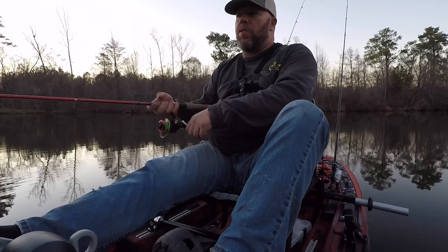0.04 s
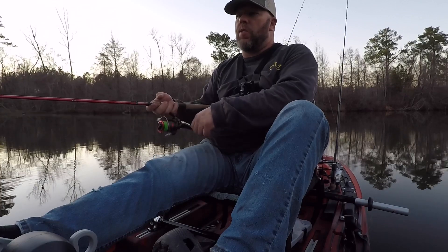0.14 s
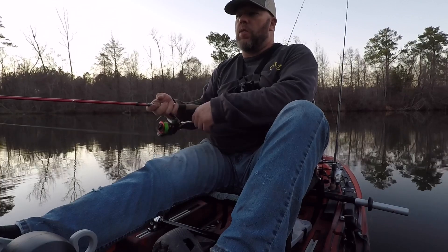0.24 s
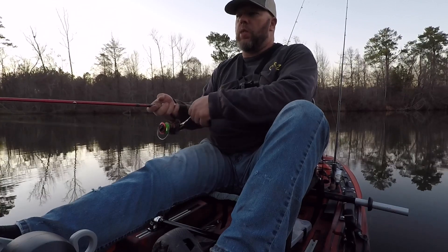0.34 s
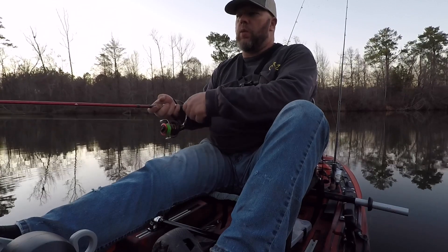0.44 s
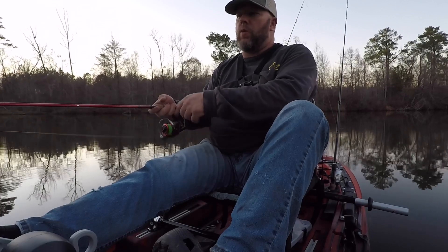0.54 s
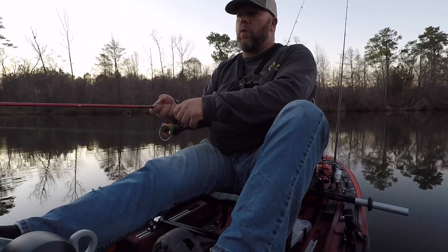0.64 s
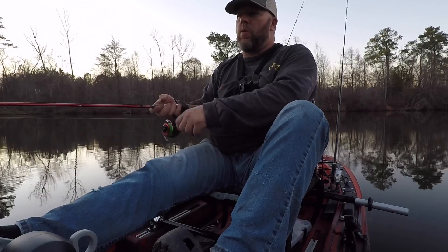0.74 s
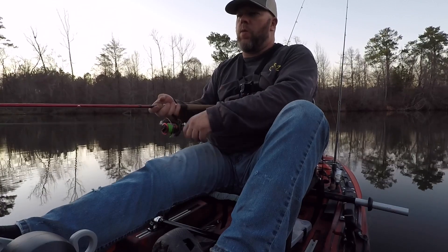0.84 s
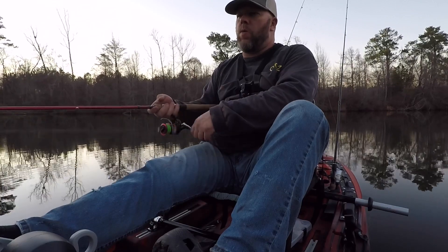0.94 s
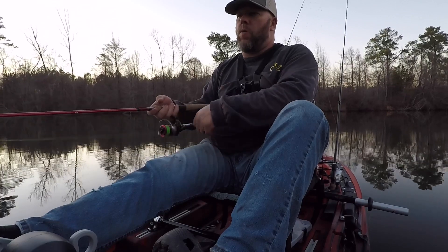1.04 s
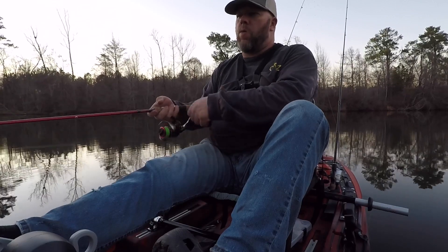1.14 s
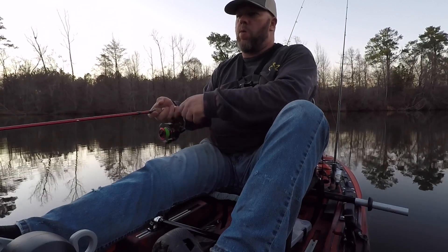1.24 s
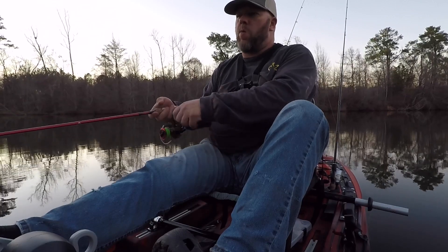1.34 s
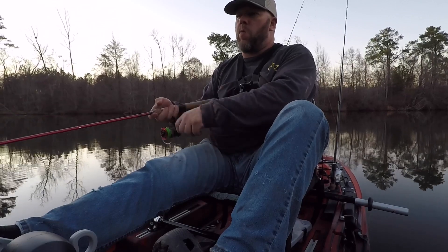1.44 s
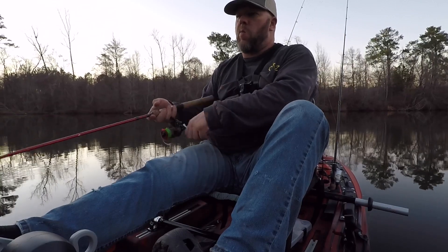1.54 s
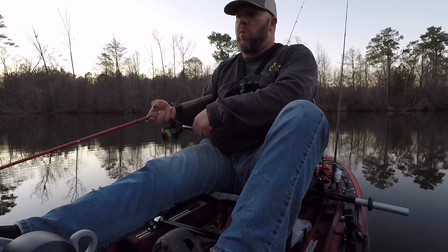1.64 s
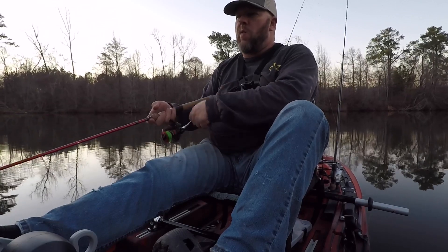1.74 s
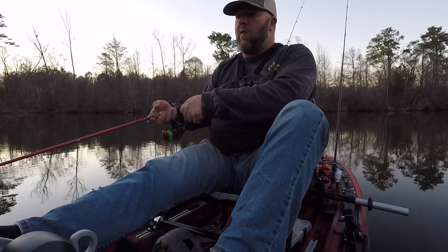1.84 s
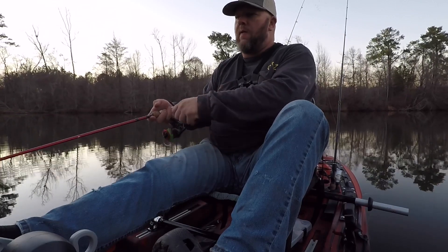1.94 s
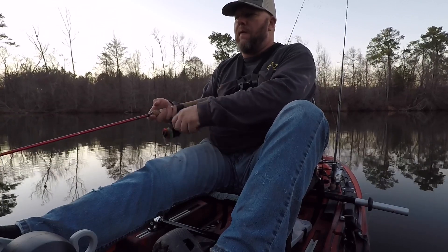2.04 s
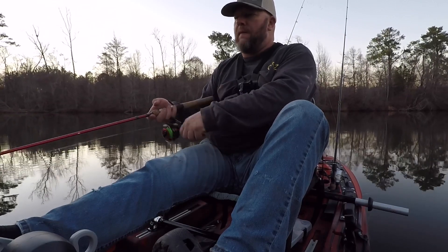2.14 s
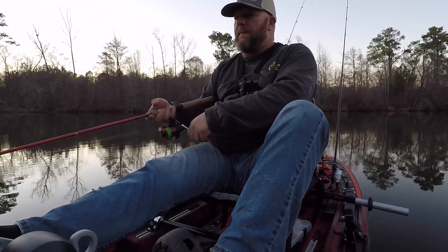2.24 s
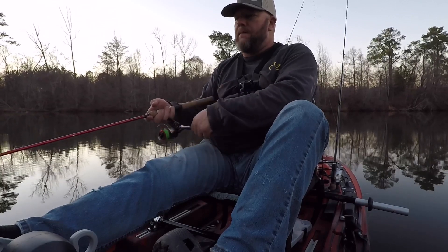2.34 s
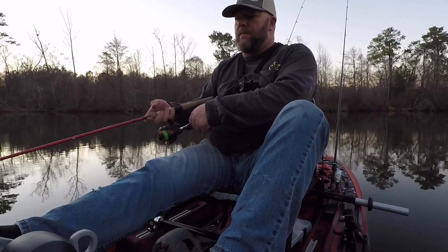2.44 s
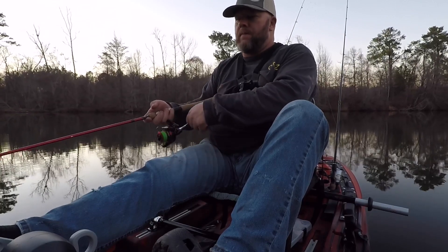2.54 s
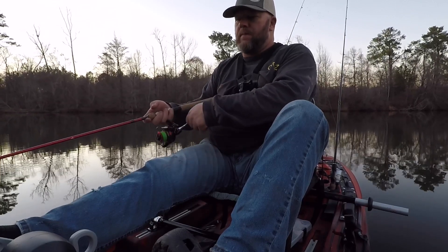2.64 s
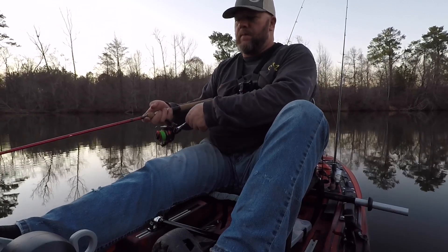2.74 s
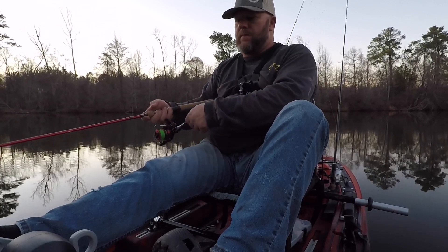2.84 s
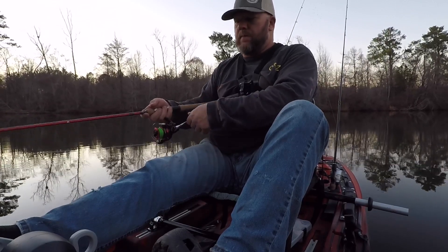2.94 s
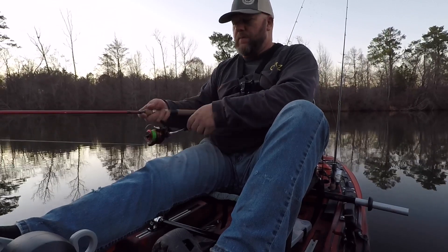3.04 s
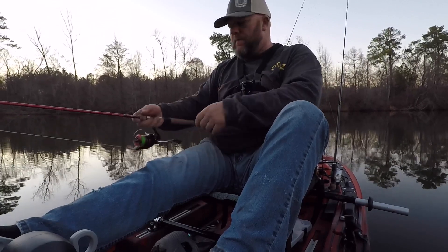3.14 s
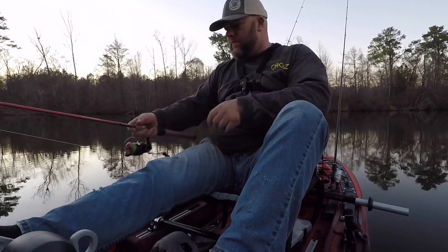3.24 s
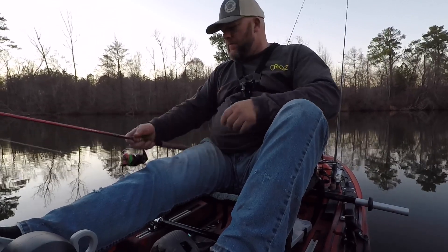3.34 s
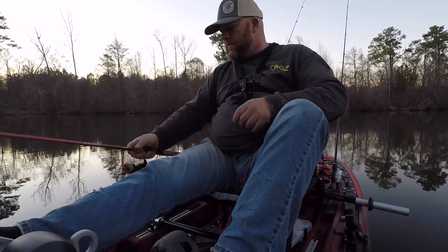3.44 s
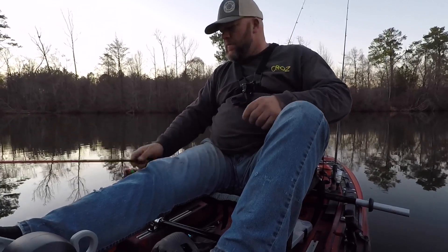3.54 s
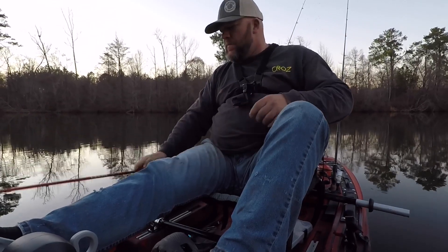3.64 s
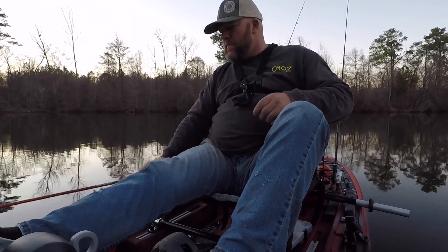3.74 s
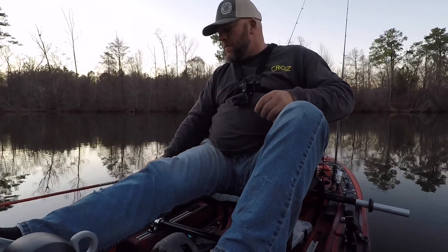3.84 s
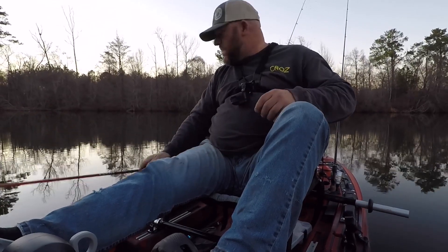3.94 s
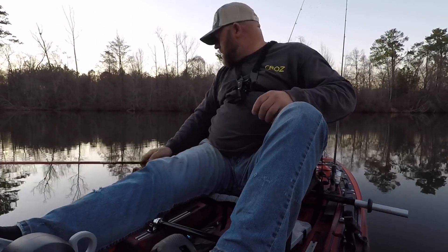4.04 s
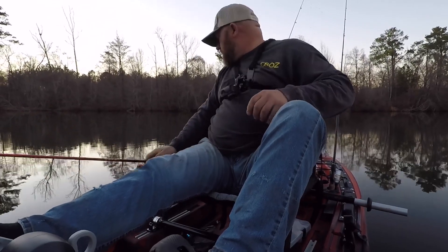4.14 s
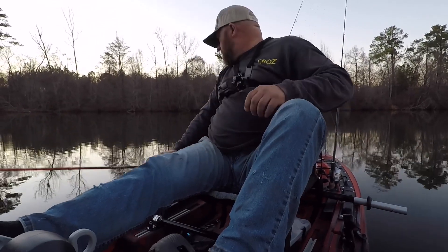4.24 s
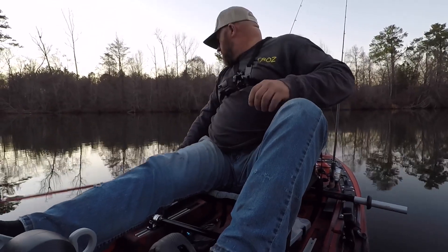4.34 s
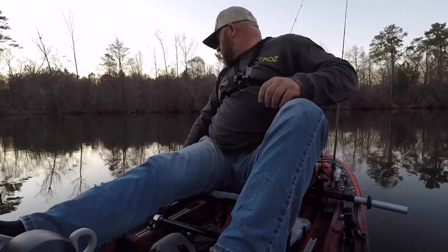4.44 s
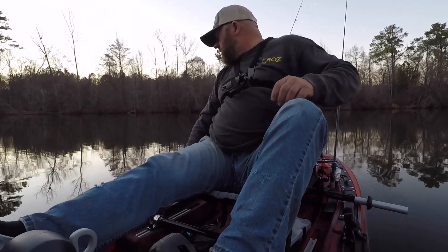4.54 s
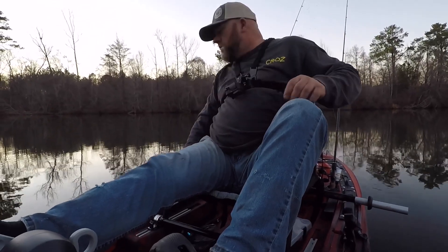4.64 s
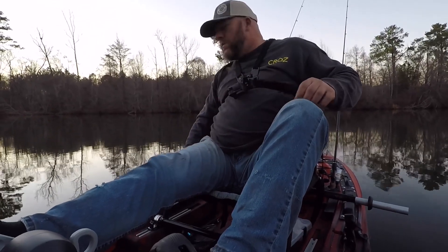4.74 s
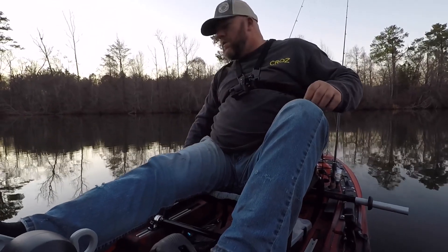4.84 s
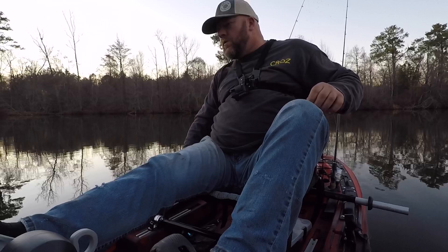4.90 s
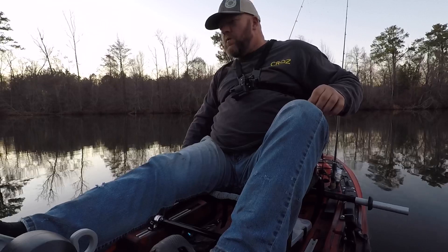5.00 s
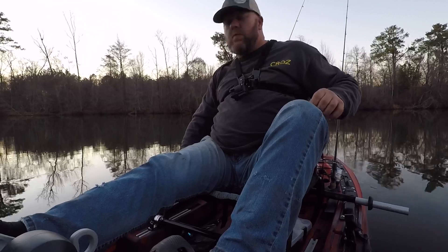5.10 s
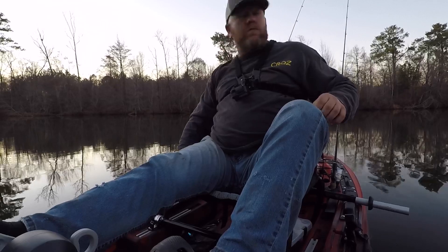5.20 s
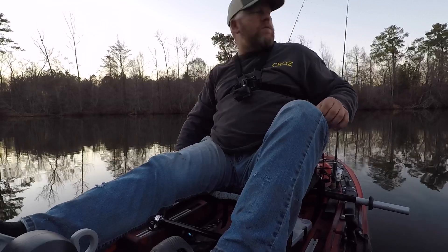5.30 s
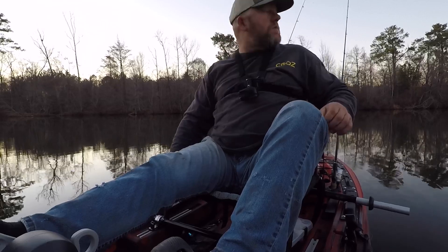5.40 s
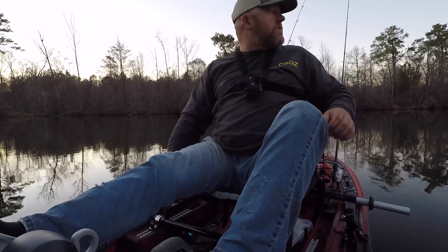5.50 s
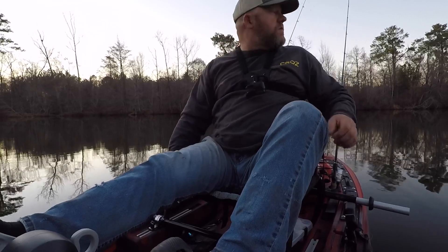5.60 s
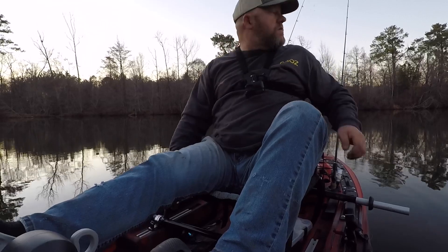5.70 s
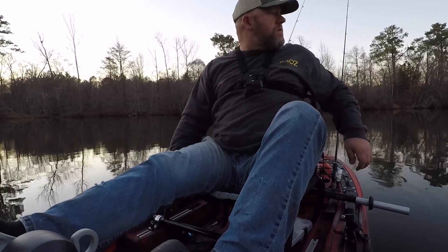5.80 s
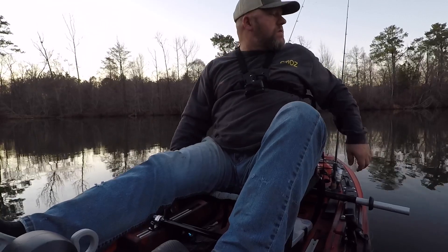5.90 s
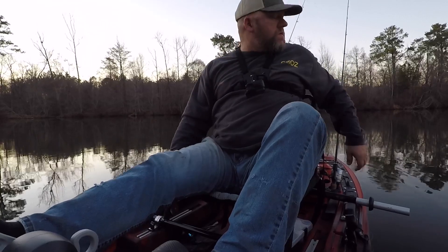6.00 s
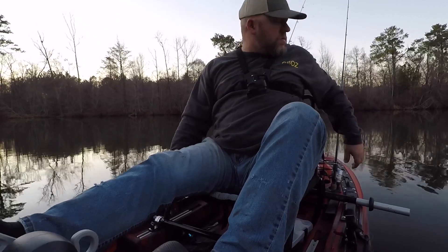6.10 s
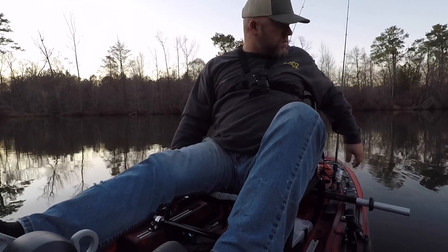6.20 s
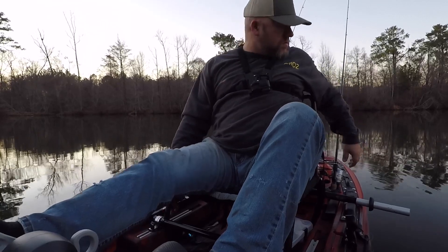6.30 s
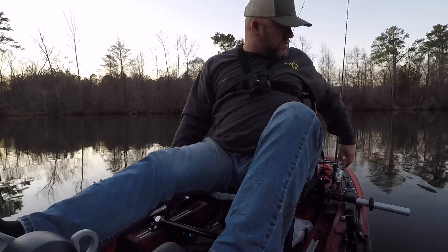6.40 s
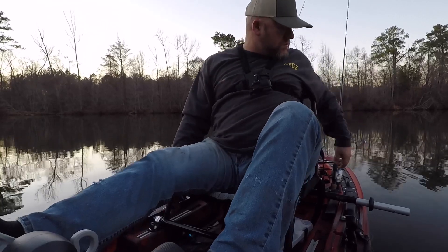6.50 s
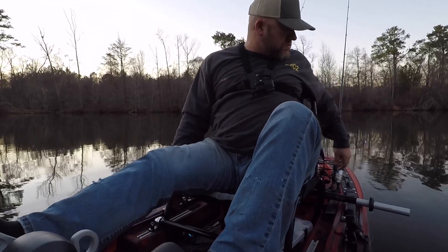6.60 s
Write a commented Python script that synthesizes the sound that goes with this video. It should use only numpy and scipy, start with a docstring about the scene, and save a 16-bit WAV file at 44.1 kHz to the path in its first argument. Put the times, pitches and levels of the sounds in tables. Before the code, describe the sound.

A steady, soft hum and hiss of an open lakeshore lies beneath a barely audible fishing reel. A low double thud and a crisp clatter of clicks come first; then the person shifts about, and the hull thuds, scrapes and creaks in irregular bursts. Everything is heard through contact with the boat, wide in stereo, the strongest bumps distorting.

```python
"""A kayak's plastic hull knocks, rubs and groans as an angler reels in and then shifts about on a calm lake.
Knocks and rubbing ring three families of hull modes, heard out of phase by two microphones fixed to the hull.
Noise grains rustle, a climbing fuzzy tone makes the reel whir, and struck metal-like modes make the tackle tick.
Shaped noise makes the slow rocking and the distant hum of the shore; loud bumps overload the input."""
import sys
import numpy as np
from scipy import signal
from scipy.fft import rfft, irfft
from scipy.io import wavfile
from scipy.ndimage import uniform_filter1d

SR = 44100
rng = np.random.default_rng(int(sys.argv[2]) if len(sys.argv) > 2 else 0)


def unload_wav(signal):
    """Save mono or channel-first audio to the path in sys.argv[1] as 16-bit WAV at rate SR, clipped to [-1, 1]."""
    wavfile.write(
        sys.argv[1],
        SR,
        np.round(np.clip(np.atleast_2d(signal).T, -1, 1) * 32767).astype(np.int16),
    )


N = 293706


def gain_of(db):
    """Decibels to gain."""
    return 10 ** (np.asarray(db) / 20)


def evened(x):
    """Scales to rms 1."""
    return x / np.sqrt(np.mean(x ** 2) + 1e-20)


def read(points, hz):
    """Reads a spectrum table on a log-frequency axis."""
    point_hz, value = np.transpose(points)
    return np.interp(np.log(hz + 1), np.log(point_hz + 1), value)


def add(mix, start, sound):
    """Mixes a sound in from a start in seconds."""
    part = mix[..., round(start * SR):][..., :sound.shape[-1]]
    part += sound[..., :part.shape[-1]]


def coloured(points):
    """Noise of rms 1 with the given spectrum."""
    spectrum = rfft(rng.standard_normal(N))
    shape = gain_of(read(points, np.fft.rfftfreq(N, 1 / SR)))
    return evened(irfft(spectrum * shape, N))


def level(rows):
    """Gain curves from a table of seconds and dB, practically silent before its first row."""
    seconds, *columns = np.transpose(rows)
    t = np.arange(N) / SR
    return gain_of([np.interp(t, seconds, column, left=-120) for column in columns])


def plateau(length, edge_s):
    """Rises, holds and falls."""
    t = np.arange(0, length, 1 / SR)
    return np.clip(np.minimum(t, length - t) / edge_s, 0, 1)


# Colour of the shore that is alike at both microphones.
# Each row: frequency in Hz, relative level in dB per Hz.
SHORE_ALIKE = [(15, -66), (25, -32), (66, -21.5), (104, -45), (143, -1), (225, -2.5), (365, -12),
               (418, -12), (754, -21.5), (817, -24), (2090, -30), (2590, -31), (3210, -33), (4200, -34),
               (8400, -33.5), (9050, -34.5), (9700, -35), (14500, -50), (15600, -88)]
# Colour of the shore that is opposed at the microphones.
# Each row: frequency in Hz, relative level in dB per Hz.
SHORE_OPPOSED = [(15, -80), (25, -49), (104, -56), (125, -15), (177, -6), (208, -12.5), (478, -18.5),
                 (518, -12), (561, -17.5), (885, -19), (2200, -33.5), (2520, -32.5), (3210, -43.5),
                 (10200, -39), (14500, -58), (15600, -90)]
ALIKE_DB, OPPOSED_DB = -39.5, -40  # rms of each part


def shore():
    """Distant hum and hiss: shaped noise, one part alike and one part opposed at the two microphones."""
    alike = gain_of(ALIKE_DB) * coloured(SHORE_ALIKE)
    opposed = gain_of(OPPOSED_DB) * coloured(SHORE_OPPOSED)
    return np.array([alike + opposed, alike - opposed])


# Faint whir of the line being wound in, one pull at a time.
# Each row: start in seconds, length in seconds, climb time in seconds, first pitch in Hz, last pitch in Hz,
# level in dB.
PULLS = [(0., 0.32, .26, 2480, 2614, -63), (0.42, 0.32, .17, 2360, 2710, -62),
         (0.742, 0.46, 0.44, 2340, 2780, -60.5), (1.183, 0.22, .19, 2330, 2800, -63),
         (1.416, 0.33, .17, 2390, 2580, -62)]
WHIR_EDGE_S = 0.041
WHIR_STEADY = 1.1  # amplitude of the unbroken core of the whistle; its fuzz has rms 1


def whir():
    """A fuzzy whistle: slow noise carried on a tone that climbs with each pull."""
    out = np.zeros(N)
    for start, length, climb, first_hz, last_hz, db in PULLS:
        shape = plateau(length, WHIR_EDGE_S)
        t = np.arange(len(shape)) / SR
        hz = first_hz + (last_hz - first_hz) * np.minimum(t / climb, 1)
        turn = 2 * np.pi * np.cumsum(hz) / SR
        slow = uniform_filter1d(rng.standard_normal((2, SR)), size=220)[:, :len(hz)]
        fuzz = evened(slow[0] * np.cos(turn) + slow[1] * np.sin(turn))
        whistle = evened(WHIR_STEADY * np.sin(turn) + fuzz)
        add(out, start, gain_of(db) * shape * whistle)
    return out


# Ticks of reel and tackle.
# Each row: moment in seconds, peak in dB before panning, centre in Hz, left over right in dB.
TICKS = [(0.6833, -40, 4600, 2), (.686, -27.5, 7400, -4), (.688, -31, 5850, 3), (.69, -42, 1560, 0),
         (0.815, -39, 6160, 0), (1.199, -37, 7460, -5), (2.371, -9.5, 4860, 2), (2.389, -18, 3760, 0),
         (2.402, -25, 4740, 1), (2.416, -11.5, 7300, 3), (2.4185, -26, 1520, -1), (2.425, -20, 7160, -4),
         (2.4387, -23, 4400, 9), (2.4387, -9, 4940, 4), (2.441, -17, 3270, -7), (2.4393, -16, 7200, 2),
         (2.4456, -17, 3140, 5), (2.4653, -28.5, 3070, -1), (2.918, -35.5, 4470, 0),
         (2.9776, -28, 2250, -4), (3.015, -39, 3120, 2), (3.057, -35, 1980, -1), (3.245, -38.5, 1870, 0),
         (3.305, -35.5, 7050, 0), (3.4415, -31, 2250, 0), (3.557, -29.5, 5150, 1), (3.9518, -26, 7670, 11),
         (3.956, -27.5, 4060, -8), (3.9748, -32, 4330, -1), (4.026, -33, 5270, 3), (4.085, -39, 4400, 3),
         (4.147, -37, 7280, 6), (4.34, -37, 6840, 2), (4.451, -37, 2530, 20), (4.515, -30, 3600, 1),
         (4.562, -21, 5340, 1), (4.6436, -30, 2710, -3), (4.6709, -21.5, 3740, 0), (4.8272, -12, 4620, 6.5),
         (4.876, -48, 2110, 9), (4.94, -31, 3960, 0), (4.9947, -23, 6000, 0), (5.02, -20.5, 3530, -2),
         (5.047, -24, 4000, 3), (5.233, -32, 3450, -2), (5.3048, -36.5, 1990, -1), (5.4271, -26, 5740, 0),
         (5.5122, -19.5, 2500, 2), (5.544, -32, 2040, 7), (5.5793, -29, 2520, 1), (5.669, -32, 2500, 0),
         (5.7078, -29.5, 8000, 0), (5.797, -35, 2100, -1), (5.8137, -30.5, 3000, -3),
         (5.906, -29.5, 2600, 2), (5.9707, -31, 1990, -5), (6.199, -36, 2640, -4), (6.5113, -36.5, 4800, 3)]
# Modes of the tackle.
# Each row: frequency in Hz, relative strength in dB, t60 in seconds.
TACKLE_MODES = [(1100, 7, .02), (2157, 11.5, 0.059), (3122, 6, 0.067), (3656, 5.5, 0.053), (4210, 3, .02),
                (4870, -3, 0.035), (5740, -6, 0.027), (6500, 7, 0.022), (7200, 16, 0.028),
                (7660, 19.5, 0.019), (8740, 21.5, 0.011), (12300, 28, 0.0057), (13800, 29, 0.0041)]
# Likeness of the two microphones for a tick.
# Each row: frequency in Hz, likeness from -1 to 1.
LIKENESS = [(60, 0.13), (110, 0.15), (200, 0.34), (380, 0.02), (700, 0.94), (1290, 1), (2380, 0.1),
            (4400, 0.47), (8120, -0.00048), (15000, -0.75)]
TICK_T60_S, RINGING = 0.032, 0.55  # length of a contact; share that rings, 0-1
STRIKE_SPREAD_DB, DETUNE = 2.5, 0.007  # how unevenly the modes are struck; spread of tuning as a fraction
PIECE_DB, PIECE_T60_S = 17.0, 0.022  # ring of the struck piece, on the scale of the tackle modes


def ticks():
    """Short noisy contacts ring a struck piece and the tackle modes, each time slightly differently tuned."""
    out, t, hz = np.zeros((2, N)), np.arange(4096) / SR, np.fft.rfftfreq(4096, 1 / SR)
    same = read(LIKENESS, hz)
    bending = np.exp(-2j * np.pi * 6.63 * np.log(1 + hz / 2395.0))  # low partials travel slower along the rod
    air = 1j * hz / (2600.0 + 1j * hz) / np.sqrt(1 + (hz / 7700.0) ** 6)  # colour of the microphone ports
    for moment, db, centre_hz, pan_db in TICKS + faint_ticks():
        detune, strike = rng.standard_normal((2, len(TACKLE_MODES)))
        ring = gain_of(PIECE_DB - 60 * t / PIECE_T60_S) * np.sin(2 * np.pi * centre_hz * t)
        for (mode_hz, mode_db, t60), d, e in zip(TACKLE_MODES, detune, strike):
            fall = gain_of(mode_db + STRIKE_SPREAD_DB * e - 60 * t / t60)
            ring += fall * np.sin(2 * np.pi * mode_hz * (1 + DETUNE * d) * t)
        body = RINGING * rfft(ring) / np.linalg.norm(ring) + 1 - RINGING  # the rest is a bare, flat crack
        contact = rng.standard_normal((2, 4096)) * gain_of(-60 * t / TICK_T60_S) * (1 - np.exp(-t / 0.00021))
        a, b = rfft(contact)
        pair = np.array([a, same * a + np.sqrt(1 - same ** 2) * b])
        band = 1j * hz / centre_hz / (1 + 0.85j * hz / centre_hz - (hz / centre_hz) ** 2)
        tick = irfft(pair * body * band * air * bending)
        side_db = np.array([[pan_db], [-pan_db]]) / 2
        add(out, moment - 0.0012, gain_of(db + side_db) * tick / abs(tick).max())  # a short lead-in
    return out


FAINT_COUNT, FAINT_FIRST_S, FAINT_LAST_S = 18, 2.55, 6.6  # scattered while the gear is handled
FAINT_DB, FAINT_SPREAD_DB, FAINT_PAN_DB = -41, 6, 8  # middle of the peaks; full ranges of peak and pan
FAINT_LOW_HZ, FAINT_HIGH_HZ = 2000, 7400


def faint_ticks():
    """Small extra ticks at random moments, in rows like those of TICKS."""
    rows = []
    for a, b, c, d in rng.random((FAINT_COUNT, 4)):
        moment = FAINT_FIRST_S + (FAINT_LAST_S - FAINT_FIRST_S) * a
        db = FAINT_DB + FAINT_SPREAD_DB * (b - 0.5)
        centre_hz = FAINT_LOW_HZ * (FAINT_HIGH_HZ / FAINT_LOW_HZ) ** c
        rows.append((moment, db, centre_hz, FAINT_PAN_DB * (d - 0.5)))
    return rows


# How hard the body works against the hull.
# Each row: time in seconds, effort in dB.
EFFORT = [(1.6, -43), (2.3, -52), (2.8, -58), (2.95, -34), (3.3, -30), (3.85, -27.5), (4.15, -33),
          (4.4, -31), (4.6, -19.5), (4.76, -21), (5.06, -20), (5.28, -24.5), (5.45, -15.5), (5.7, -14.5),
          (5.8, -18.5), (6.08, -24.5), (6.2, -22.5), (6.4, -24), (6.52, -10.5), (6.66, -45)]
# Gear dragged over the deck.
# Each row: start in seconds, length in seconds, level in dB, extra brightness in dB (fittings and clothes),
# pitch in Hz of the panel under it.
DRAGS = [(3.958, 0.27, -37.5, 9.5, 560), (4.629, 0.16, -29, 6.5, 580), (4.837, 0.14, -33, -3, 543),
         (5.522, 0.083, -16.5, 4.5, 576), (5.592, 0.19, -17, -2.5, 525), (5.82, 0.057, -31, -4, 570),
         (5.914, 0.12, -25.5, -0.5, 556), (6.1, 0.11, -31, 1, 550), (6.264, 0.088, -27, 1, 560),
         (6.473, 0.166, -32, 5, 540)]
# One value each for flex, panels, fittings and clothes: how strongly effort rubs them [dB].
RUB_DB = [-3, -10, -23.5, -42]
# The shudder after each knock, for the same four: level against the knock [dB], then t60 [s].
SETTLE_DB = [-11.5, -11, -13, -32]
SETTLE_T60_S = [0.44, 0.14, 0.32, 0.075]
# How a drag reaches the same four [dB].
DRAG_DB = [-17, -5.5, -19.5, -31.5]
DRAG_EDGE_S = 0.046


def rubbing():
    """Gain of the rubbing in flex, panels, fittings and clothes: powers of effort, shudders and drags add up."""
    power = (level(EFFORT) * gain_of(RUB_DB)[:, None]) ** 2
    t = np.arange(SR // 3) / SR
    fall_db = np.array(SETTLE_DB)[:, None] - 60 * t / np.array(SETTLE_T60_S)[:, None]
    for start, panels_db, flex_db, fittings_db, *_ in KNOCKS:
        knock_db = np.array([[flex_db], [panels_db], [fittings_db], [fittings_db]])
        add(power, start, gain_of(fall_db + knock_db) ** 2)
    for start, length, db, bright_db, _ in DRAGS:
        drag_db = db + np.array(DRAG_DB)[:, None] + bright_db * np.array([[0], [0], [1], [1]])
        add(power, start, (gain_of(drag_db) * plateau(length, DRAG_EDGE_S)) ** 2)
    return np.sqrt(power)


# Modes of hull and mount.
# Each row: frequency in Hz, t60 in seconds, relative left level in dB, relative right level in dB,
# right phase in radians.
HULL_MODES = [(155, 0.26, -5.5, -2.5, 2.5), (190.9, 0.13, 2, -4, 3.5), (225.8, 0.37, -7, -12.5, 3),
              (219.4, 0.025, -15.5, -10, 4), (365, 0.025, -10.5, -21, 4), (432, 0.089, -20.5, -53, 18),
              (535.4, 0.052, -9, -10, 3.5), (587, 0.019, -8, -18.5, 3.5), (751.4, 0.05, -10.5, -14.5, 5.5),
              (794, 0.037, -14.5, -9.5, 2), (830, 0.018, -17, -35, 3.5), (931.3, 0.08, -20, -30, 0.5),
              (1035, 0.049, -24, -35, 5.5), (1233, 0.02, -38, -18, -1), (1279.6, 0.074, -35.5, -26.5, 0.34),
              (1590, 0.016, -29.5, -36, 2.5), (1833, 0.07, -37.5, -31, 0.5), (2470, 0.035, -32.5, -41, 4.5)]
PANELS_HZ = 300, 700  # below, the whole hull flexes; between, deck panels; above, small fittings
# What flex, panels and fittings pass on to the microphones.
# Each row: low edge in Hz, high edge in Hz.
PASS_HZ = [(125, 375), (260, 603), (600, 3200)]
# Knocks on the hull.
# Each row: start in seconds, then left-microphone peaks of panels, flex and fittings in dB,
# swell of the flex in seconds, pitch of the struck panel in Hz, pitch of the nearest fitting in Hz.
KNOCKS = [(1.619, -41, -25, -51, 0.028, 320, 1130), (1.84, -31, -19, -37, 0.013, 577, 856),
          (1.855, -16.5, -7.5, -32, 0.014, 453, 736), (1.948, -48, -14, -45, 0.013, 339, 1310),
          (2.039, -27, -15.5, -48, 0.025, 314, 830), (2.906, -25, -18.5, -43, 0.023, 317, 1270),
          (2.937, -28, -11, -31.5, 0.0032, 546, 795), (2.981, -12, -10, -24, 0.0071, 540, 905),
          (2.993, -2.5, -13.5, -21.5, 0.032, 559, 884), (3.072, -24, -11.5, -50, 0.0063, 427, 744),
          (3.21, -32, -22, -55, 0.046, 570, 780), (3.282, -14, -4.5, -39, 0.017, 408, 780),
          (3.424, -15, -6, -31, 0.0099, 346, 830), (3.442, -13.5, -9.5, -21.5, 0.016, 377, 896),
          (3.459, -16, -4.5, -34, 0.0047, 553, 820), (3.589, -27, -13, -36, 0.0093, 553, 790),
          (3.68, -34, -7, -35.5, 0.028, 470, 730), (3.744, -21.5, -11.5, -56, 0.021, 307, 1180),
          (3.864, -23, -15, -53, 0.014, 342, 1430), (3.942, -20, -24, -36, 0.0034, 400, 876),
          (3.952, -15.5, -14.5, -38, 0.0027, 562, 870), (4.01, -30, -15.5, -59, 0.0054, 350, 1090),
          (4.059, -34, -11, -49, 0.023, 340, 810), (4.281, -12, -24, -54, 0.004, 584, 1290),
          (4.428, -44, -11.5, -42, 0.0088, 336, 1110), (4.449, 3.5, 5, -33, 0.005, 340.3, 1040),
          (4.466, -13, -6, -28, 0.0041, 370, 1050), (4.496, -18, -6, -51, 0.018, 380, 1000),
          (4.53, -36, -35, -28, 0.025, 740, 760), (4.565, -14, 0, -16, 0.0078, 490, 845),
          (4.578, -8.5, -4.5, -39, 0.01, 554, 790), (4.612, -14, -2.5, -26, 0.0077, 362, 726),
          (4.644, -6.5, 1, -9, 0.0046, 760, 1203), (4.671, -2, -2, -6, 0.009, 582, 763),
          (4.69, 0.5, -2, -24, 0.011, 385, 1030), (4.711, -25, -4, -19, 0.012, 640, 960),
          (4.726, -20, -7, -26, 0.004, 400, 1010), (4.747, -23, -12, -24, 0.011, 553, 970),
          (4.769, -29, -12.5, -27, 0.016, 550, 990), (4.827, 5, -1, -5.5, 0.0085, 493, 1257),
          (4.847, -1.5, -5.5, -13, 0.018, 334, 880), (4.887, -15, -15.5, -31, 0.004, 352, 730),
          (4.876, -0.5, -3.5, -26, 0.0036, 364, 690), (4.903, -9, -4.5, -32, 0.011, 518, 1280),
          (4.929, -7, -7, -32, 0.0031, 355, 890), (4.997, -7, -11.5, -20.5, 0.026, 589, 850),
          (5.025, -6.5, -8, -22, 0.045, 554, 1320), (5.077, -19, -14, -41, 0.051, 350, 720),
          (5.178, -15.5, -9.5, -39, 0.0098, 484, 724), (5.199, -32, -28, -29, 0.024, 493, 1345),
          (5.352, -8.5, -11, -25, 0.027, 410, 910), (5.381, -7.5, -7, -46, 0.035, 365, 970),
          (5.423, -12, -7, -34, 0.0094, 337, 914), (5.514, 0.5, 6.5, -9, 0.0074, 568, 938),
          (5.544, -7.5, 1, -19, 0.0097, 592, 937), (5.573, -17.5, -27, -18, 0.008, 584, 945),
          (5.59, -20, -36, -18.5, .008, 520, 940), (5.602, -8.5, -24, -30, 0.0087, 550, 1270),
          (5.63, -10, -28, -33, .009, 507, 960), (5.671, -18, -29, -25, 0.0076, 300, 940),
          (5.714, -8, -26, -32, 0.0082, 434, 940), (5.691, -15, -28, -21, 0.012, 497, 1300),
          (5.744, -19, -9.5, -51, 0.013, 490, 1280), (5.813, -9.5, -3.5, -22.5, 0.011, 359, 910),
          (5.828, -5, -3, -40, 0.033, 363, 865), (5.907, -12, -2, -22, 0.0041, 615, 1328),
          (5.942, -16, -9.5, -30, 0.0078, 573, 1000), (5.969, -20.5, -25, -26.5, 0.0078, 570, 1306),
          (6.064, -38, -14, -48, 0.03, 380, 1230), (6.107, -23, -13, -28.5, 0.016, 527, 713),
          (6.129, -23, -14, -28, 0.035, 526, 770), (6.198, -37, -14, -30, 0.019, 546, 1290),
          (6.272, -18, -9.5, -26.5, 0.0079, 560, 1300), (6.398, -26, -20, -32, 0.014, 567, 1255),
          (6.484, -12, -5, -23, 0.0048, 557, 909), (6.519, -32, -11, -32, 0.011, 541, 875),
          (6.541, -6.5, 1.5, -15.5, 0.017, 498, 875), (6.557, -14, -1, -38, 0.041, 346, 925),
          (6.601, -17, -17, -26, 0.0042, 544, 740)]
STIFF_DB = 3.5  # a knock is sharp when its panels are this far over its flex
CHATTER_S, SHARP_CHATTER_S = 0.0087, 0.0069  # a sharp knock is shorter
ROCK_HZ, STIFF_ROCK_HZ, ROCK_GRIT = 180, 263.7, 0.8  # a sharp knock rocks faster; noise in the rocking
CLEAN_PANEL, CLEAN_FITTING = 0.4, 0.4  # amplitude of the clean give of panel and fitting
SLIPS_PER_S, SLIP_SPREAD_DB = 4000, 2  # stick-slip of the rubbing
GROAN_DB, GROAN_Q = -20.5, 11  # a drag keeps the panel under it humming, level against the drag


def hull_rings():
    """Decaying sines of each mode family at both microphones, the right with its own phases."""
    t = np.arange(8192) / SR
    rings = np.zeros((3, 2, len(t)))
    for hz, t60, left_db, right_db, phase in HULL_MODES:
        fall_db = 60 * t / t60
        left = gain_of(left_db - fall_db) * np.sin(2 * np.pi * hz * t)
        right = gain_of(right_db - fall_db) * np.sin(2 * np.pi * hz * t + phase)
        rings[np.searchsorted(PANELS_HZ, hz)] += np.array([left, right]) / np.sqrt(t60)
    for family, band_hz in enumerate(PASS_HZ):
        sos = signal.butter(N=4, Wn=band_hz, btype="band", fs=SR, output="sos")
        rings[family] = signal.sosfilt(sos, rings[family])
    return rings / np.linalg.norm(rings[:, :1], axis=2, keepdims=True)  # left energy 1


def rubbing_force():
    """Stick-slip noise on flex, panels and fittings, with a groan at the panel under each drag."""
    lumps = evened(uniform_filter1d(rng.standard_normal(N), 500))  # rubbing comes in uneven slips
    slip_db = SLIP_SPREAD_DB * np.minimum(rng.exponential(1, (3, N)), 4)
    slips = gain_of(slip_db) * (rng.random((3, N)) < SLIPS_PER_S / SR)
    force = rubbing()[:3] * gain_of(0.98 * lumps) * evened(slips * rng.standard_normal((3, N)))
    for start, length, db, _, panel_hz in DRAGS:
        shape = plateau(length, DRAG_EDGE_S)
        noise = rng.standard_normal(SR)[:len(shape)]
        groan = signal.lfilter(*signal.iirpeak(panel_hz, GROAN_Q, SR), noise)
        add(force[1], start, gain_of(db + GROAN_DB) * shape * evened(groan))
    return force


def knock_blow(start, sharp_knock, swell, panel_hz, fitting_hz):
    """Force of one knock: a slow lean on the flex, and noisy chatter with a clean tone on panel and fitting."""
    t = np.arange(8192) / SR
    rock_hz, chatter = (STIFF_ROCK_HZ, SHARP_CHATTER_S) if sharp_knock else (ROCK_HZ, CHATTER_S)
    sharp = np.exp(-t / chatter) * (1 - np.exp(-t / 0.000043))
    grit = rng.standard_normal(len(t))
    lean = t / swell  # weight settles on the hull more slowly than the knock
    # one running phase: each load feeds the rocking already under way
    rocking = np.sin(2 * np.pi * rock_hz * (start + t)) + ROCK_GRIT * grit
    panel = signal.lfilter(*signal.iirpeak(panel_hz, 3.0, SR), sharp * grit)  # the nearest panel answers most
    panel += CLEAN_PANEL * sharp * np.sin(2 * np.pi * panel_hz * t)  # and gives once, cleanly, under the blow
    fitting = 0.99 * sharp * grit
    fitting += signal.lfilter(*signal.iirpeak(fitting_hz, 6.0, SR), sharp * grit)
    fitting += CLEAN_FITTING * sharp * np.sin(2 * np.pi * fitting_hz * t)  # the nearest fitting sings out
    return np.array([lean * np.exp(-lean ** 2) * rocking, panel, fitting])


def hull():
    """Rubbing and knocks drive each family of modes, which rings on into both microphones."""
    rings = hull_rings()
    out = signal.oaconvolve(rubbing_force()[:, None], rings, axes=2).sum(0)[:, :N]
    for start, panels_db, flex_db, fittings_db, swell, panel_hz, fitting_hz in KNOCKS:
        blow = knock_blow(start, panels_db - flex_db > STIFF_DB, swell, panel_hz, fitting_hz)
        sound = signal.fftconvolve(blow[:, None], rings, axes=2)
        sound /= abs(sound[:, :1]).max(2, keepdims=True)  # left peak 1 in each family
        add(out, start, np.tensordot(gain_of([flex_db, panels_db, fittings_db]), sound, 1))
    return out


def rustle():
    """Clothes rubbing: dense small grains of scraping, partly shared by both microphones."""
    grains = gain_of(1.7 * np.minimum(rng.exponential(1, (2, N)), 4)) * rng.standard_normal((2, N))
    grains *= rng.random((2, N)) < 0.15  # density of the grains
    sos = signal.butter(N=2, Wn=[1300.0, 6000.0], btype="band", fs=SR, output="sos")
    a, b = signal.sosfilt(sos, grains)
    return rubbing()[3] * evened(np.array([a, 0.65 * a + 1.1 * b]))


# The mount rocking.
# Each row: time in seconds, level in dB before the balance of the sides.
SWAY = [(2.8, -69), (3.15, -60), (4.15, -60), (4.41, -79), (4.45, -28), (4.52, -57), (4.67, -32),
        (4.93, -29.5), (5.0, -26), (5.09, -23), (5.17, -26), (5.25, -21), (5.3, -35), (5.4, -18),
        (5.48, -32), (5.58, -18.5), (5.78, -23.5), (5.96, -16.5), (6.09, -29), (6.14, -27), (6.4, -30.5),
        (6.58, -16.5), (6.66, -36.5)]
# Colour of the rocking.
# Each row: frequency in Hz, relative level in dB per Hz.
SWAY_COLOUR = [(8.8, -43), (15, 12), (32, -21.5), (65, 11), (81, 3), (109, -13), (119, -37), (130, -4.5),
               (170, -92), (290, -120)]
SURGE_DB = -0.5  # the rocking comes in uneven heaves


def sway():
    """Slow rocking of the mount: low shaped noise, partly shared by both microphones."""
    shared, own = coloured(SWAY_COLOUR), coloured(SWAY_COLOUR)
    smooth = uniform_filter1d(rng.standard_normal(N), size=1500)
    heaves = evened(uniform_filter1d(smooth, size=1500))
    balance = gain_of([[3.0], [-2.0]])  # left, right
    return level(SWAY) * gain_of(SURGE_DB * heaves) * balance * np.array([shared, 0.57 * shared + own])


SQUEAK_START_S, SQUEAK_LENGTH_S, SQUEAK_HZ, SQUEAK_DB = 4.03, 0.11, 4540, -56  # level before its fade


def squeak():
    """A thin tone of steady pitch that fades."""
    out = np.zeros(N)
    shape = plateau(SQUEAK_LENGTH_S, 0.008)
    t = np.arange(len(shape)) / SR
    fade = gain_of(SQUEAK_DB - 6.4 * t / SQUEAK_LENGTH_S)
    add(out, SQUEAK_START_S, fade * shape * np.sin(2 * np.pi * SQUEAK_HZ * t))
    return out


def scene():
    """All sources together."""
    return shore() + whir() + ticks() + hull() + rustle() + sway() + squeak()


EDGE_HZ, KNEE = 16000, 30  # band limit; a higher knee bends more abruptly


def record(dry):
    """The input overloads with a rounded knee at full scale; then the band limit."""
    clipped = 1.01 * dry / (1 + abs(dry) ** KNEE) ** (1 / KNEE)
    lowpass = signal.firwin(511, EDGE_HZ, window=("kaiser", 9), fs=SR)
    return signal.oaconvolve(clipped, lowpass[None], "same")


dry = scene()
out = record(dry)
unload_wav(out)
```